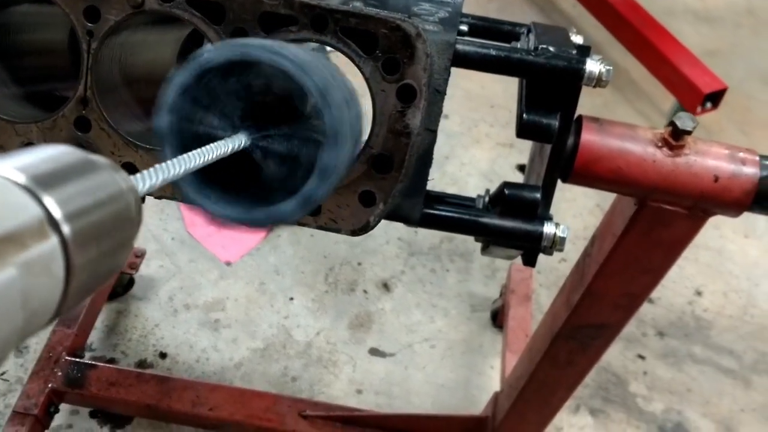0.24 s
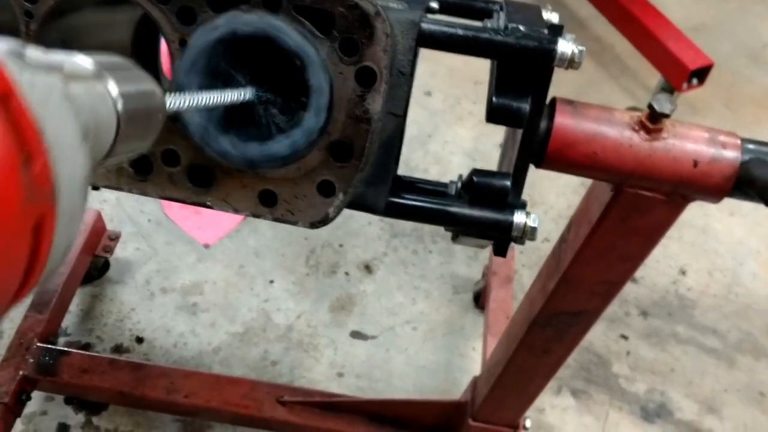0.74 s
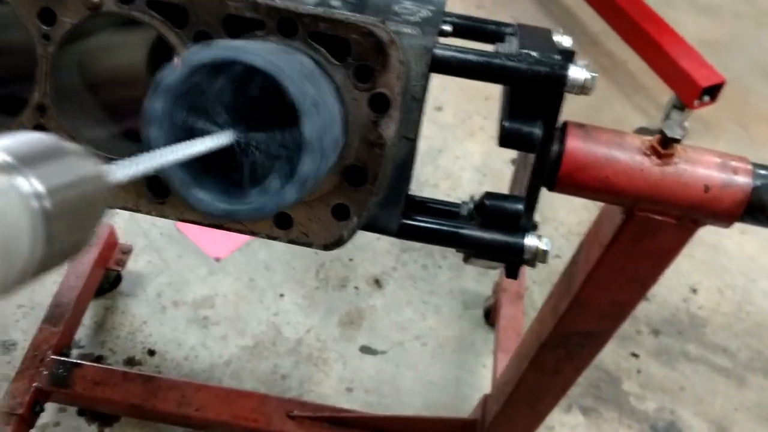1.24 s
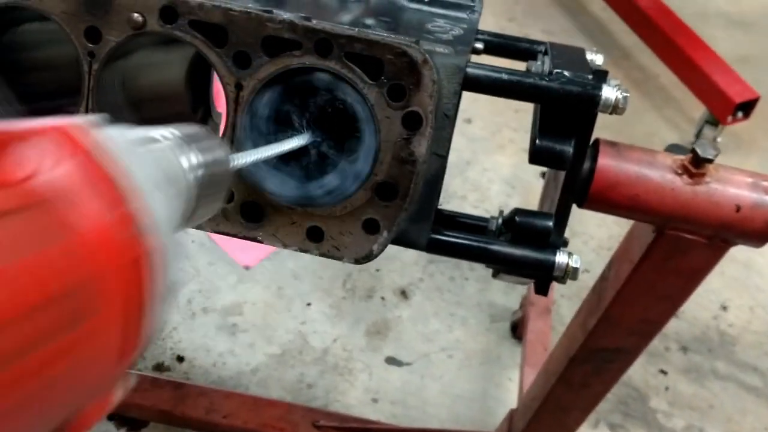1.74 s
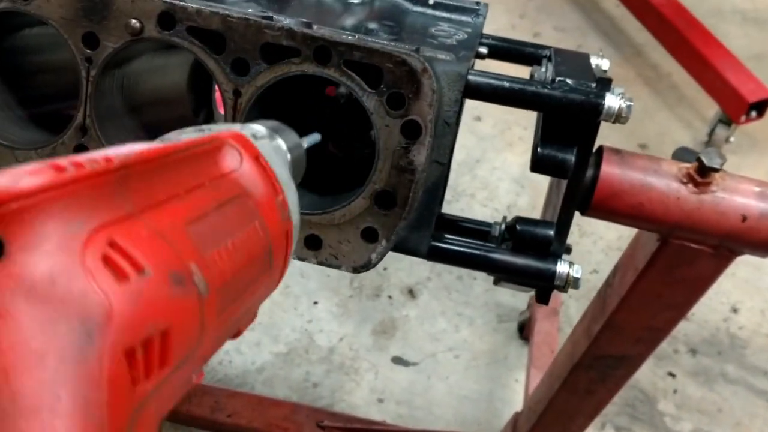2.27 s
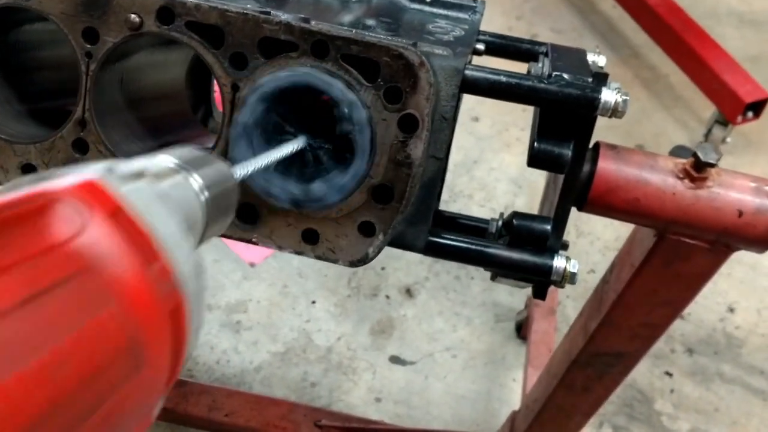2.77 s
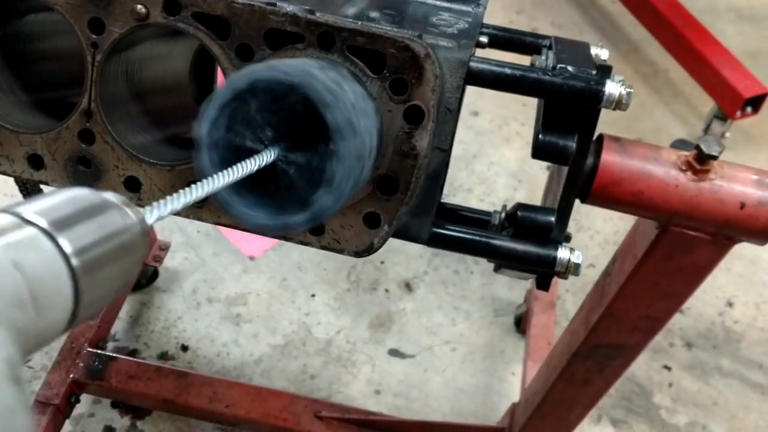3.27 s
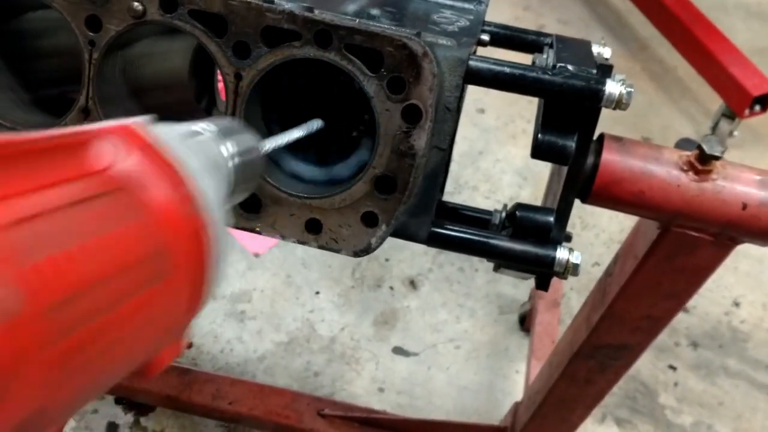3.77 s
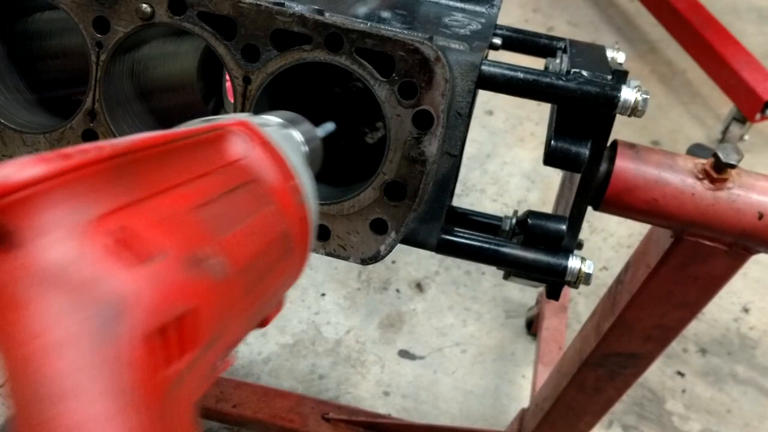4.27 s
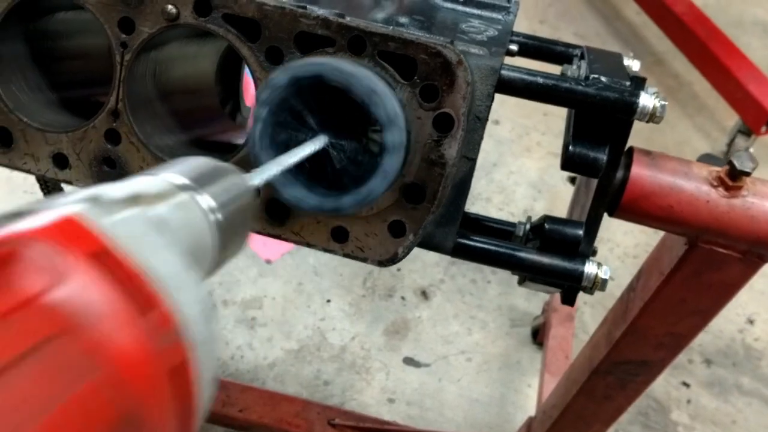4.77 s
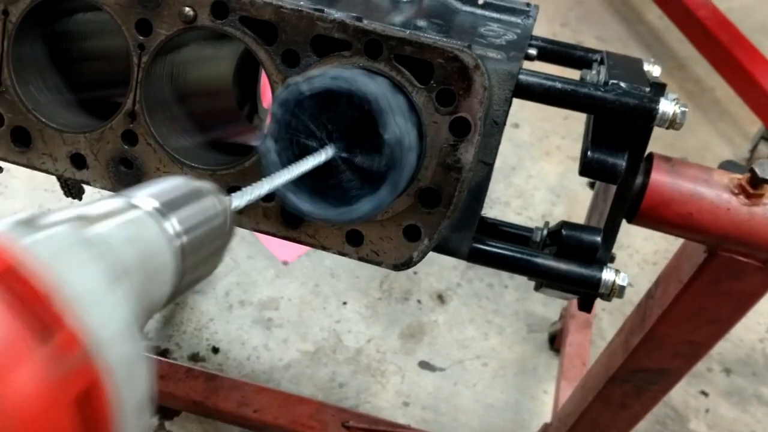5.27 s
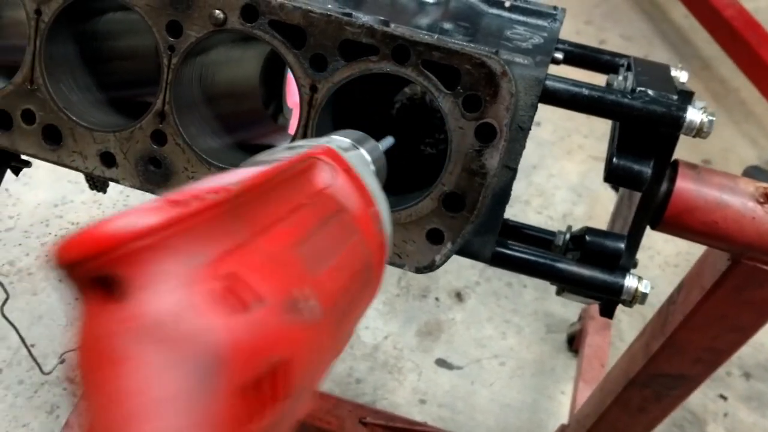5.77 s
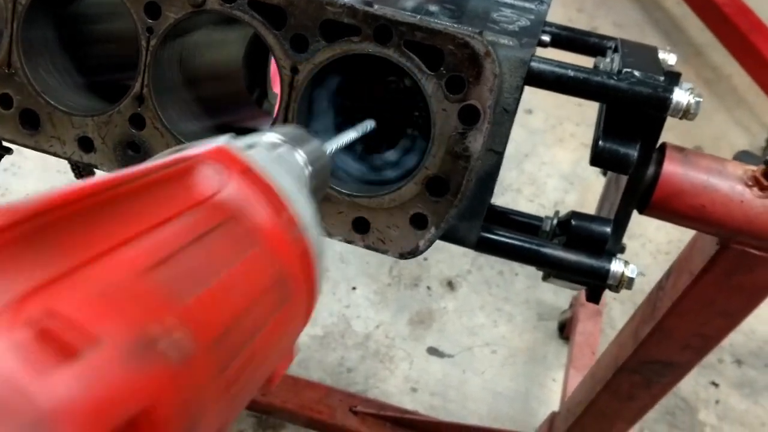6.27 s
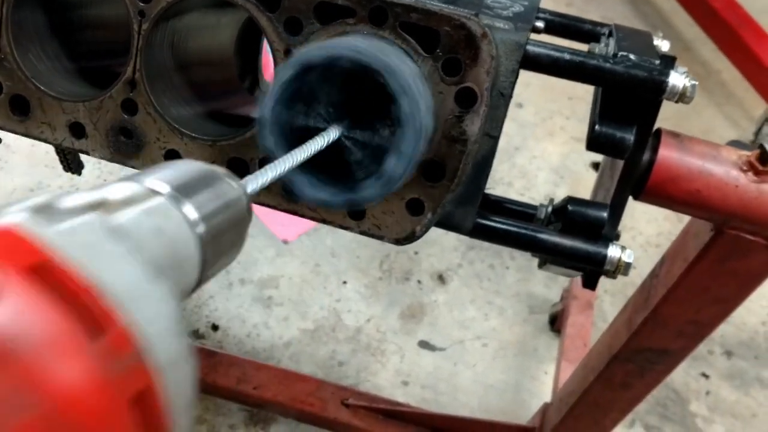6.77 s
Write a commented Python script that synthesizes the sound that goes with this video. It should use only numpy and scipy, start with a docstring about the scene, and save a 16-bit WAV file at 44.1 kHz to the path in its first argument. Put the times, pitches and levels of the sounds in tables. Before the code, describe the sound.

An electric drill spins a ball hone in an iron engine cylinder. The motor first speeds up and whines higher with a loud hollow scrub, then settles into quick in-and-out strokes. Each stroke brings swells of gritty hiss, a brief sag in pitch, gear chatter and sharp ticks at the rim. Close stereo microphones in a workshop, with faint low air puffs.

```python
"""The abrasive balls of a hone scrub the wall of a cylinder in an iron engine block: a gritty hiss of
small impacts over the hollow ring of the air in the bore, with ticks as balls snap over the rim.
An electric drill spins the hone and pumps it in and out; motor and gears whine on multiples of shaft
speed, sag and chatter under load on each stroke. Behind them lie a faint draught and brief puffs of air.
A close pair of microphones hears it in a workshop."""
import sys
import numpy as np
from scipy import signal
from scipy.fft import rfft, irfft, next_fast_len
from scipy.io import wavfile
from scipy.ndimage import uniform_filter1d, map_coordinates

SR = 44100
rng = np.random.default_rng(int(sys.argv[2]) if len(sys.argv) > 2 else 0)


def digitize_waveform(pressure):
    """Quantize a signal to 16-bit integers and store it at the path in sys.argv[1].

    Rows of a 2-D input are taken as channels; values are limited to [-1, 1].
    """
    field = np.atleast_2d(pressure).T
    bounded = np.clip(field, -1, 1)
    quanta = np.round(bounded * 32767).astype(np.int16)
    wavfile.write(sys.argv[1], SR, quanta)


N = 310023
TIME = np.arange(N) / SR
FFT_SIZE = next_fast_len(N + SR // 2)
BINS_HZ = np.maximum(np.arange(FFT_SIZE // 2 + 1) * SR / FFT_SIZE, 1)
CUTOFF_HZ = 15900
DRIVE_HZ = 60  # the speed control feeds the motor in pulses


def from_db(db):
    """Logarithmic level: decibels to amplitude gain."""
    return 10 ** (np.asarray(db) / 20)


def rms_one(x):
    """Normalisation: scale to rms 1."""
    return x / np.sqrt(np.mean(x ** 2) + 1e-20)


def in_time(rows):
    """Linear interpolation: each column of a curve table at every sample."""
    s, *columns = np.transpose(rows)
    return [np.interp(TIME, s, column) for column in columns]


def over_hz(points):
    """Interpolation on a logarithmic frequency axis: a spectrum table at every frequency bin."""
    hz, value = np.transpose(points)
    return np.interp(np.log(BINS_HZ), np.log(hz), value)


def filtered(x, response):
    """Linear filtering: multiply the spectrum by a frequency response."""
    return irfft(rfft(x, FFT_SIZE) * response, FFT_SIZE)[..., :N]


def drift(rate):
    """Low-passed noise: smooth chance with spread 1 and about rate turns a second."""
    # a double pole, run at one twentieth of the sample rate past its start-up
    pole = np.exp(-40 * np.pi * rate / SR)
    noise = rng.standard_normal(N // 20 + 4002)
    slow = signal.lfilter([1], [1, -2 * pole, pole * pole], noise)[4000:]
    return np.interp(np.arange(N) / 20, np.arange(len(slow)), rms_one(slow))


def swell(s, width):
    """Gaussian envelope: a smooth rise and fall of height 1 around a moment."""
    return np.exp(-((TIME - s) / width) ** 2)


def panned(db):
    """Interaural level difference: left and right gains that differ by so many dB."""
    return from_db(np.array([[.5], [-.5]]) * db)


# Level balance of the microphone pair. Each row: frequency in Hz, left-right difference in dB.
PAIR_BALANCE = [(120, 2.5), (280, -1.5), (430, 8), (750, 5), (1050, 1.5), (1350, -5), (1550, -1),
                (1900, -0.5), (3400, 0), (4400, -1), (5200, 3), (7200, 5), (10000, 3.5), (14000, -1.5)]
# Coherence of the pair. Each row: frequency in Hz, likeness of the two channels from 0 to 1.
PAIR_LIKENESS = [(100, 0.67), (220, 0.27), (330, 0.1), (450, 0.87), (640, 0.84), (850, 0.99), (1100, 0.95),
                 (1220, 1), (1400, 0.26), (1700, 0.9), (2000, 0.52), (2180, 1), (2500, 0.98), (3350, 1),
                 (5000, 1), (5500, 0.66), (7200, 0.83), (8000, 0.78), (9200, 0.065)]
# Phase of the pair. Each row: frequency in Hz, phase lead of the left in rad beyond its delay.
PAIR_LEAD = [(150, -1), (300, 0.3), (400, 1.1), (550, 0.7), (1000, 0.1), (1330, -0.7), (1470, 2.5),
             (1850, 1.52), (2200, -0.54), (4400, 0.3), (7800, 0.73)]
# Sound from the far side. Each row: frequency in Hz, share reaching the right microphone first
# from 0 to 1, of which at most a half is used.
RIGHT_FIRST = [(1900, 0), (2300, 0.4), (2780, 0.4), (3870, 0.64), (4400, 0.55), (5000, 0.4), (7200, 0.26)]
PORT_DELAY_MS = 0.451


def microphone_pair():
    """Interference: sound arrives from both sides, so the two paths cancel in turn up the spectrum."""
    lag = 2 * np.pi * BINS_HZ * PORT_DELAY_MS / 1000
    crossed = np.clip(over_hz(RIGHT_FIRST), 0, .5)
    left_first = (1 - crossed) * np.exp(-1j * (lag + over_hz(PAIR_LEAD)))
    right_first = crossed * np.exp(1j * lag)
    shared = np.clip(over_hz(PAIR_LIKENESS), 0, 1) * (left_first + right_first)
    unrelated = np.sqrt(np.maximum(1 - abs(shared) ** 2, 0))
    return shared, unrelated, panned(over_hz(PAIR_BALANCE))


def at_microphones(sound, colour, pair):
    """Partial coherence: a direct sound plus its unrelated scatter off block and room."""
    shared, unrelated, balance = pair
    direct, scatter = rfft(sound, FFT_SIZE)
    right = shared * direct + unrelated * scatter
    return irfft(np.array([direct, right]) * colour * balance, FFT_SIZE)[:, :N]


def moving(sound, lag_ms):
    """Varying path length: the right channel arrives a changing moment later."""
    left, right = sound
    heard_at = (TIME - lag_ms / 1000) * SR
    return np.array([left, map_coordinates(right, [heard_at], order=5, mode="nearest")])


def impacts(per_s, spread_db, ring_ms):
    """Shot noise: rms-1 envelope of many small contacts of uneven force, each dying quickly."""
    force = from_db(spread_db * np.minimum(rng.exponential(1, N), 4))
    hits = (rng.random(N) < per_s / SR) * force ** 2
    # contacts add in energy; ring_ms is the time constant of that energy
    decay = np.exp(-1000 / (ring_ms * SR))
    energy = signal.lfilter([1], [1, -decay], hits + 1e-12)
    return rms_one(np.sqrt(energy))


def friction(envelope, colour, pair):
    """Modulated noise: rubbing shaped by contact and colour, at both microphones."""
    return at_microphones(envelope * rng.standard_normal((2, N)), rms_one(colour), pair)


def tone(phase, lead=0):
    """Propagation delay: a sine of rms 1 that reaches the right microphone a little later."""
    late = np.interp(TIME - PORT_DELAY_MS / 1000, TIME, phase)
    return np.sqrt(2) * np.sin([phase, late - lead])


# Moments when the whole sound but the rim ticks drops abruptly and creeps back.
# Each row: start in seconds, depth in dB.
LEVEL_DIPS = [(1.19, 4), (1.489, 5.5), (1.87, 4), (2.161, 7), (3.973, 4), (4.655, 8), (5.77, 5)]


def level_dips():
    """Gain reduction: the level falls fast, holds, then climbs back at a steady rate in dB."""
    fall_s, hold_s, recover_db_per_s = 0.017, 0.017, 10.5
    cuts = []
    for s, depth_db in LEVEL_DIPS:
        fall = np.clip((TIME - s) / fall_s + .5, 0, 1)
        remaining_db = np.clip(depth_db - recover_db_per_s * (TIME - s - hold_s), 0, depth_db)
        cuts.append(fall * remaining_db)
    return from_db(-np.max(cuts, axis=0))


# Air from the drill's vents brushes the microphones.
# Each row: centre in seconds, half width of the swell in seconds, level in dB.
VENT_PUFFS = [(2.02, .03, -31), (2.085, .03, -30.5), (3.44, .035, -43.5), (3.55, .045, -45),
              (5.52, .03, -36)]
# Broad spectrum of the puffs. Each row: frequency in Hz, relative density in dB per Hz.
PUFF_SPECTRUM = [(25, -25), (70, -12), (150, 0), (220, -1), (330, -6), (800, -26)]
# Broad spectrum of the draught. Each row: frequency in Hz, relative density in dB per Hz.
DRAUGHT_SPECTRUM = [(25, -8), (90, 2), (180, -3), (300, -15), (800, -37)]


def vent_puffs(deep):
    """Turbulent pressure: low buffeting on both microphones, a draught that dies on each push and puffs."""
    envelope = sum(from_db(db) * swell(s, half_width) for s, half_width, db in VENT_PUFFS)
    air = rms_one(filtered(rng.standard_normal((3, N)), from_db(over_hz(PUFF_SPECTRUM))))
    draught = rms_one(filtered(rng.standard_normal(N), from_db(over_hz(DRAUGHT_SPECTRUM))))
    lumps = impacts(per_s=300, spread_db=2, ring_ms=5)
    # mostly common to both microphones, with a smaller separate part in each
    puffs = envelope * lumps * (1.7 * air[0] + .5 * air[1:])
    draught_db = -63.5 + 4 * drift(2.4) - 11 * deep
    return puffs + from_db(draught_db) * draught


# The hone runs free at the mouth of the bore, then is pushed in.
# Each row: time in seconds, motor speed in turns per second before smoothing by inertia.
SPIN_UP_SPEED = [(0, 272.7), (.37, 325.1), (.54, 341.6), (.64, 346.5), (.72, 342.5), (.87, 321.7),
                 (1.13, 294.5)]
# Strokes, each from the moment the hone is pulled up to the rim. Each row: start in seconds,
# slowest and fastest motor speed in turns per second before smoothing by inertia.
STROKE_SPEEDS = [(1.2, 291.5, 305.0), (1.85, 281.0, 303.5), (2.59, 282.5, 294.0), (3.25, 280.0, 297.5),
                 (3.94, 280.0, 297.0), (4.64, 283.0, 297.5), (5.32, 283.5, 297.0), (6.02, 283.5, 300.0),
                 (6.68, 283.0, 297.5)]


def motor_speed():
    """Load torque and inertia: turns per second through the spin-up, then a sag and recovery each stroke."""
    recover_s, push_s, cruise_s = .19, .34, .47  # after the start of the stroke
    push_sag_per_s, cruise_per_s = 5.5, 291.5  # turns per second
    inertia_s = .05
    points = list(SPIN_UP_SPEED)
    for s, slowest, fastest in STROKE_SPEEDS:
        points += [(s, slowest), (s + recover_s, fastest)]
        points += [(s + push_s, fastest - push_sag_per_s), (s + cruise_s, cruise_per_s)]
    speed, = in_time(points)
    return uniform_filter1d(speed, round(inertia_s * SR), mode="nearest")


def gear_chatter(angle, drive, speed, rasp_db, pair):
    """Backlash: each drive pulse knocks the gears together, louder and sharper as the motor labours."""
    labour = np.clip((292 - speed) / 17, 0, 1)
    beat = np.cos(drive) - 1
    sharpness = .4 + 1.2 * labour ** 2
    knocks = np.exp(sharpness * beat) * from_db(1.5 * drift(70))
    # even out the level over four drive pulses
    knocks = knocks / np.sqrt(uniform_filter1d(knocks ** 2, round(4 * SR / DRIVE_HZ)))
    mesh_multiple = 11.8  # of motor speed
    ring = knocks * tone(mesh_multiple * angle + .7 * drift(60))
    throb = rms_one(np.exp((.1 + labour) * beat))
    casing_resonance = 1 / (1 + ((BINS_HZ - 3450) / 260) ** 2)
    casing = friction(throb, casing_resonance, pair)
    ring_db = rasp_db - 16 + 17.5 * labour
    casing_db = rasp_db - 10 + 13 * labour
    return from_db(ring_db) * ring + from_db(casing_db) * casing


# Motor and gear tones. Each entry: multiple of motor speed on which they sing.
WHINE_MULTIPLES = (1, 2.55, 5, 8, 9, 16, 24, 25.85, 38.89, 48)
# One row for each multiple. Each row: rms level in dB before fading, flutter and panning, extra dB
# under load, extra dB when drawn back, extra dB when close, extra dB when deep in the bore,
# left-right difference in dB, extra phase lead of the left in rad, roughness in rad.
WHINE_TONES = [(-60.5, 0, 8.5, 0, -9, 15, 2.5, 0.54), (-57, -1.5, 14.5, -11, -13, 11.5, 1.5, .05),
               (-58.5, -30, 17.5, -1, 14, -15, 0, 0.57), (-45, 7.5, -3, 11.5, 0, 2.5, 0.31, 0.57),
               (-48.5, -18, -7, 4, 4, 9, -1, 0.52), (-45.5, 2, -13, 2, -2, 4, 0, 1.2),
               (-45.5, 1.5, 8.5, 4.5, -18, 6, 0, 0.44), (-52.5, 11, -13, 0, -4, 8, 0.5, 1.5),
               (-45.5, -2, -0.5, 1, -11.5, 9, 1, 0.91), (-54.5, 0, 5, -2, 11, 4, 0.5, 1.3)]
# The main gear whistle waxes and wanes during the spin-up; its last value then holds.
# Each row: time in seconds, extra level in dB.
WHISTLE_SWING_DB = [(0, 5), (.11, 2.5), (.145, 0), (.22, -6), (.28, 2), (.44, 5), (.5, -4), (.6, 5),
                    (.74, -5), (.8, 6), (.96, -13), (1.1, 7), (1.25, 7)]


def drill_whine(angle, drive, load, drawn, close, deep):
    """Harmonic and gear-mesh tones: drive pulses sway them and play in the gears roughens them."""
    whistle_multiple = 24
    out = np.zeros((2, N))
    sway = .009 * (np.sin(drive) + drift(14))
    strain = np.interp(TIME - .05, TIME, load)  # the tones answer the load .05 s late
    swing_db, = in_time(WHISTLE_SWING_DB)
    for multiple, row in zip(WHINE_MULTIPLES, WHINE_TONES):
        db, load_db, drawn_db, close_db, deep_db, pan_db, lead, rough = row
        # every tone comes and goes, and reflections shift, as the drill moves
        fading_db = 2.4 * drift(8) + 1.1 * np.array([drift(14), drift(14)])
        flutter_db = 2 * rough * (drift(60) + np.cos(drive) - 1)
        level_db = db + load_db * strain + drawn_db * drawn + close_db * close + deep_db * deep
        level_db = level_db + swing_db * (multiple == whistle_multiple)
        phase = multiple * (angle + sway) + rough * drift(70)
        voice = tone(phase, lead + .5 * rough * drift(13.0))
        out += from_db(level_db + fading_db + flutter_db) * panned(pan_db) * voice
    return out


# Balls snap over the rim. Each row: start in seconds, peak level in dB before the microphone response.
RIM_SNAPS = [(.479, -13), (1.1912, -14), (1.4428, -15), (1.4853, -17), (1.8068, -16), (1.8603, -14),
             (2.153, -10), (2.7798, -14), (3.2548, -15), (3.2797, -15), (3.3152, -15), (3.9823, -18),
             (4.5995, -18), (4.6443, -15), (4.6576, -17), (4.6658, -16), (4.7232, -23), (4.8908, -19),
             (5.7614, -16), (6.1038, -18)]


def rim_snaps(pair):
    """Elastic release: a ball's springy stalk flicks it at the rim, and a lighter touch ticks thinner."""
    decay_s, hardest_edge_hz, thinning_hz_per_db = .0009, 5000, 400
    out, age = np.zeros((2, N)), TIME[:SR // 20]
    hardest_db = max(db for s, db in RIM_SNAPS)
    for s, db in RIM_SNAPS:
        burst = rng.standard_normal((2, len(age))) * np.exp(-age / decay_s)
        edge_hz = min(hardest_edge_hz + thinning_hz_per_db * (hardest_db - db), CUTOFF_HZ)
        high_pass = signal.butter(2, edge_hz, "high", fs=SR, output="sos")
        tick = signal.sosfilt(high_pass, burst)
        start = round(s * SR)
        out[:, start:start + len(age)] += from_db(db) * tick / abs(tick).max()
    return at_microphones(out, 1, pair)


# Broad spectrum of the scrubbed block. Each row: frequency in Hz, relative density in dB per Hz.
SCRUB_SPECTRUM = [(30, -27), (100, -12.5), (200, -5), (300, -3.5), (450, -2), (650, 1.5), (1000, 8),
                  (1800, 4.5), (2100, -0.5), (3000, -4), (4200, -23), (7000, -15)]
# Air resonances of the bore. Each row: frequency in Hz, full width at half amplitude in Hz,
# level in dB re the bore roar, extra dB with the hone at the rim, extra dB with it deep inside.
BORE_RESONANCES = [(902, 300, -8, -17, -4.5), (1024, 346, -5, -7, 1), (1522, 300, -11, 7.5, 8),
                   (1680, 270, -7, -4, -8)]


def bore_roar(bore_db, drawn, deep, pair):
    """Cavity resonance: balls bump along the wall and ring the air; hard scrubbing also shakes the block."""
    bumps = impacts(per_s=3500, spread_db=2.0, ring_ms=4.2)
    body_db = bore_db - 5.0 + 2.9 * drawn + 0.054 * (bore_db - np.mean(bore_db))
    out = from_db(body_db) * friction(bumps, from_db(over_hz(SCRUB_SPECTRUM)), pair)
    for hz, width, db, drawn_db, deep_db in BORE_RESONANCES:
        air = 1 / (1 + ((BINS_HZ - hz ** 2 / BINS_HZ) / width) ** 2)
        level_db = bore_db + db + drawn_db * drawn + deep_db * deep
        out += from_db(level_db) * friction(bumps, air, pair)
    return out


# Swells of scraping, mostly three a stroke. Each row: centre in seconds, half width in
# seconds, extra fine hiss in dB, extra coarse rasp in dB.
SCRAPE_SWELLS = [(1.22, 0.081, 4.1, 0.6), (1.424, 0.073, 3.5, 1.3), (1.672, 0.073, 3.9, 1.3),
                 (1.835, 0.028, 5, 1.5), (1.885, 0.13, 5.3, 1.7), (2.128, 0.111, 5.4, 3.7),
                 (2.377, 0.112, 8.1, 3.4), (2.628, 0.104, 7.1, 4.9), (2.805, 0.063, 8.1, 5.2),
                 (3.026, 0.13, 10.8, 4.7), (3.281, 0.093, 9.0, 5.2), (3.474, 0.058, 8.5, 4.5),
                 (3.743, 0.13, 9.8, 4.0), (3.987, 0.075, 9.8, 6.3), (4.16, 0.074, 6.8, 4.2),
                 (4.424, 0.127, 10.4, 4.7), (4.681, 0.08, 9.5, 4.8), (4.863, 0.078, 7.0, 4.2),
                 (5.117, 0.121, 10.1, 3.4), (5.372, 0.087, 7.8, 4.2), (5.564, 0.084, 5.0, 2.5),
                 (5.768, 0.08, 10.1, 4.5), (5.869, 0.047, 8.8, 3.7), (6.052, 0.087, 8.9, 3.9),
                 (6.248, 0.072, 5.8, 2.2), (6.493, 0.096, 9.7, 3.9), (6.715, 0.079, 7.7, 3.2),
                 (6.904, 0.085, 4.7, 2.8)]


def scrape_swells():
    """Contact pressure: extra dB of fine hiss and coarse rasp as balls cross the rim, are pushed and pulled."""
    coarse_time = TIME[::64]
    s, half_width, hiss_db, rasp_db = np.transpose(SCRAPE_SWELLS)
    shapes = np.exp(-((coarse_time[:, None] - s) / half_width) ** 2)
    return [np.interp(TIME, coarse_time, shapes @ db) for db in (hiss_db, rasp_db)]


# Broad spectrum of the scratched iron. Each row: frequency in Hz, relative density in dB per Hz.
GRIT_SPECTRUM = [(100, -42), (1000, -12.5), (2200, 2.5), (3000, 4.5), (4100, 3), (6200, 3), (7300, 2.5),
                 (9000, -0.5), (11500, -5), (16000, -11)]


def grit_hiss(rasp_db, top_db, pair):
    """Abrasion: grains scratch the iron in a dense rasp; the finest, brightest come in sparser bursts."""
    top_share = 1 / (1 + (9000 / BINS_HZ) ** 12)  # power share, crossing over at 9 kHz
    colour = from_db(over_hz(GRIT_SPECTRUM))
    coarse = impacts(per_s=10000, spread_db=-5.0, ring_ms=0.66)
    fine = impacts(per_s=2000, spread_db=-0.5, ring_ms=0.98)
    rasp = friction(coarse * from_db(rasp_db + 1.0), colour * np.sqrt(1 - top_share), pair)
    hiss = friction(fine * from_db(top_db + 5.0), colour * np.sqrt(top_share), pair)
    return rasp + hiss


# Where the tool is. Each row: time in seconds, left-right difference in dB, hone drawn back to the
# rim from 0 to 1, drill body close to the microphones from 0 to 1.
TOOL_PLACE = [(0, 3.5, 1, 0), (.62, 2.8, 1, 0), (.78, 1.2, .4, 1), (.92, .6, .15, 1), (1.08, .3, 0, .45),
              (1.2, -.2, 0, 0)]
# How hard the balls rub between swells. Each row: time in seconds, then base levels in dB of the
# bore roar, coarse rasp and fine hiss.
RUBBING_LEVELS = [(0.0, -28, -31, -45), (0.2, -26, -26, -39), (0.32, -23.5, -25, -36),
                  (0.46, -25.5, -27, -40), (0.58, -26, -25, -37), (0.68, -28.5, -26, -35),
                  (0.74, -28.5, -27.5, -36.5), (0.93, -31, -31, -37.5), (1.15, -31, -30, -39),
                  (2.4, -33.5, -37, -47), (7.03, -32.5, -36, -44.5)]


def scene():
    """Superposition: hone and drill sound together, with one motor speed and one stroke motion behind both."""
    speed, pair = motor_speed(), microphone_pair()
    bore_db, rasp_db, top_db = in_time(RUBBING_LEVELS)
    more_hiss_db, more_rasp_db = scrape_swells()
    rasp_db = rasp_db + more_rasp_db
    top_db = top_db + more_hiss_db + .4 * drift(12.0)  # the fine hiss wavers slightly at random
    pan_db, drawn, close = in_time(TOOL_PLACE)
    deep = sum(swell(s + .45, .16) for s, *_ in STROKE_SPEEDS)  # deepest .45 s into each stroke
    angle = 2 * np.pi * np.cumsum(speed) / SR
    drive = 2 * np.pi * DRIVE_HZ * (TIME - .0099)
    load = 1 / (1 + np.exp((speed - 288) / 2.5))  # a slow motor is a loaded one
    hone = bore_roar(bore_db, drawn, deep, pair) + grit_hiss(rasp_db, top_db, pair)
    # the hollows of the spectrum slide as the path to the right microphone changes
    hone = moving(hone, lag_ms=.008 * deep - .0016 * drawn)
    drill = drill_whine(angle, drive, load, drawn, close, deep)
    drill = drill + gear_chatter(angle, drive, speed, rasp_db, pair)
    tool = (hone + drill) * panned(pan_db)
    return (tool + vent_puffs(deep)) * level_dips() + rim_snaps(pair)


def record(dry):
    """Polarity and band limiting: the right microphone is inverted and the top is cut steeply."""
    low_pass = signal.ellip(12, .1, 80, CUTOFF_HZ, fs=SR, output="sos")
    return signal.sosfilt(low_pass, dry * [[1], [-1]])


dry = scene()
out = record(dry)
digitize_waveform(out)
```